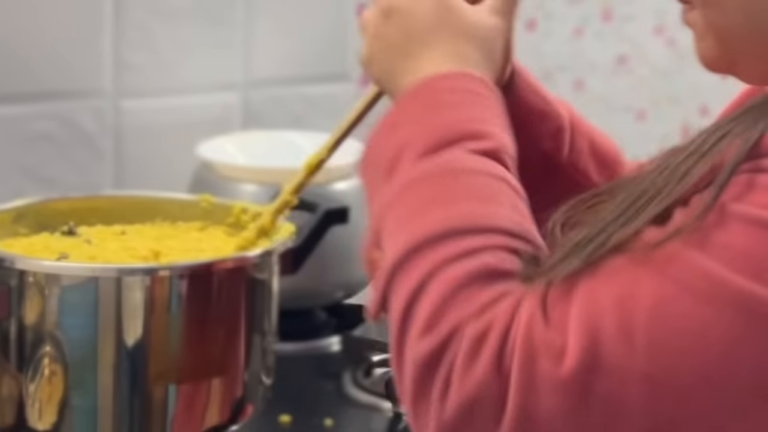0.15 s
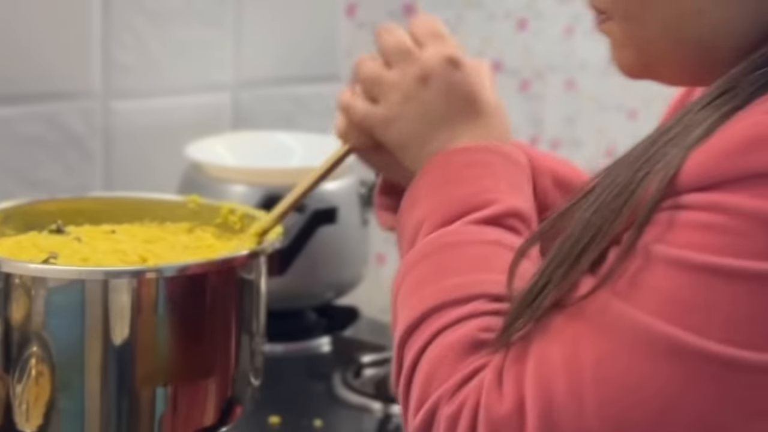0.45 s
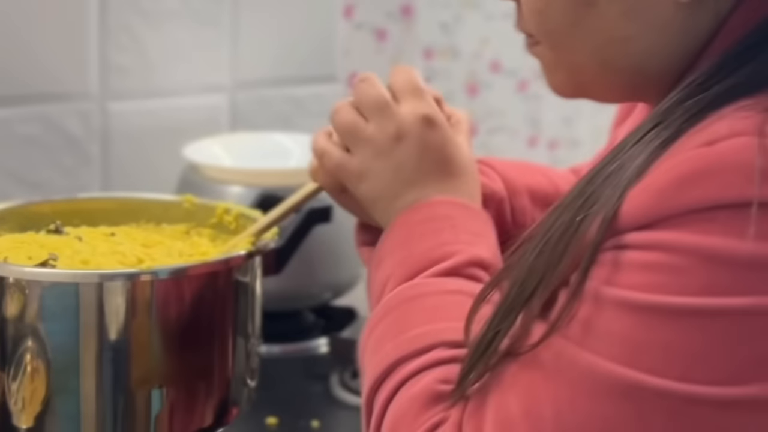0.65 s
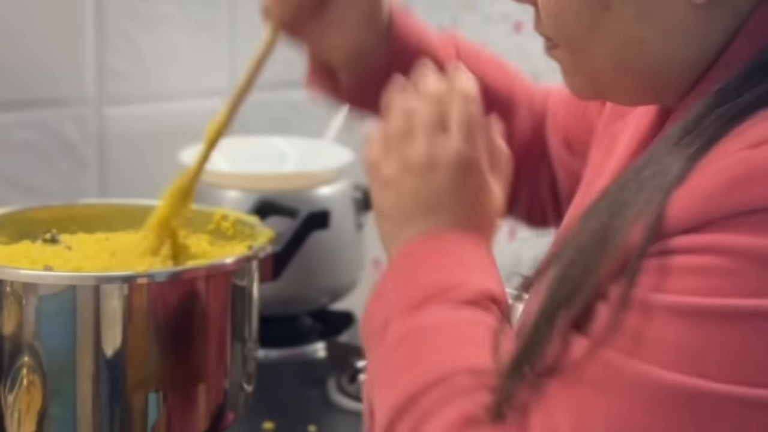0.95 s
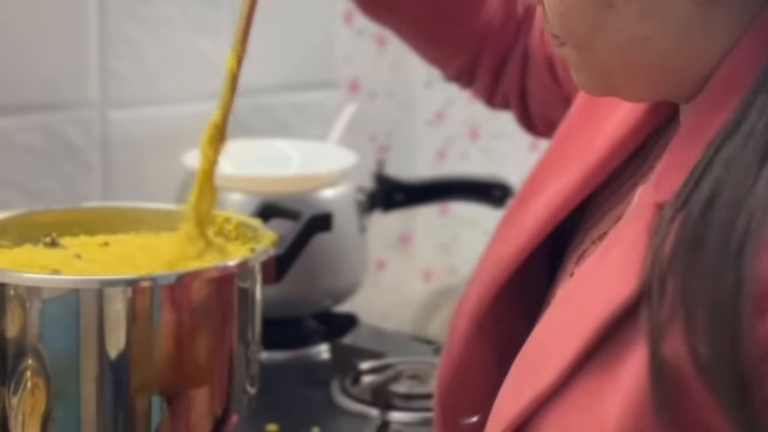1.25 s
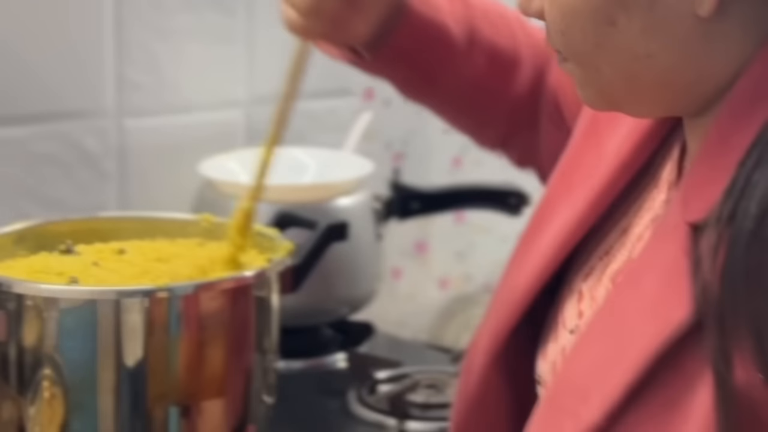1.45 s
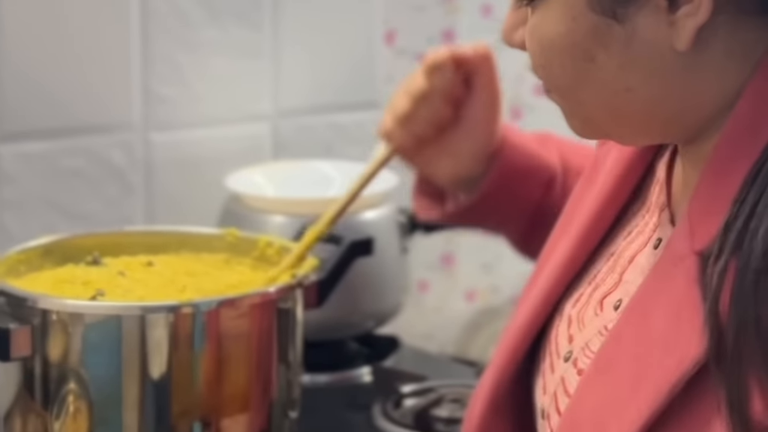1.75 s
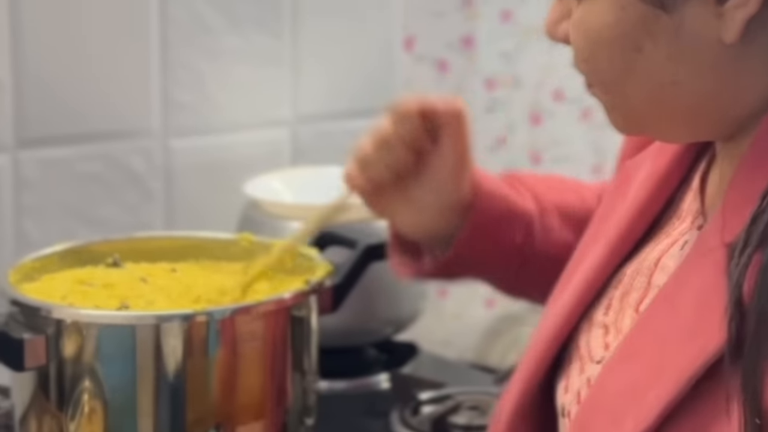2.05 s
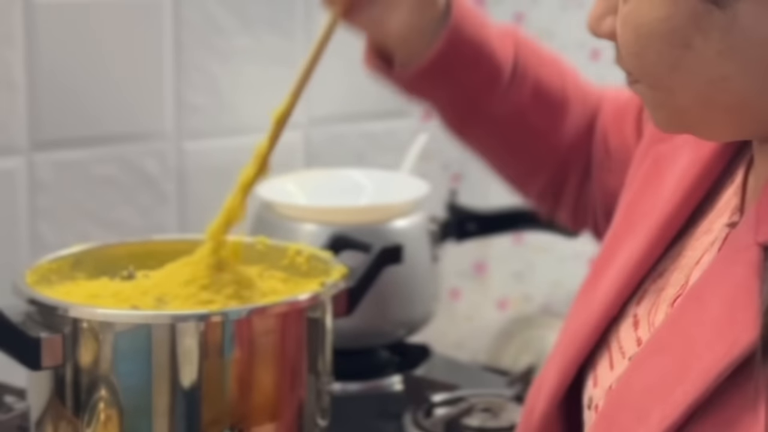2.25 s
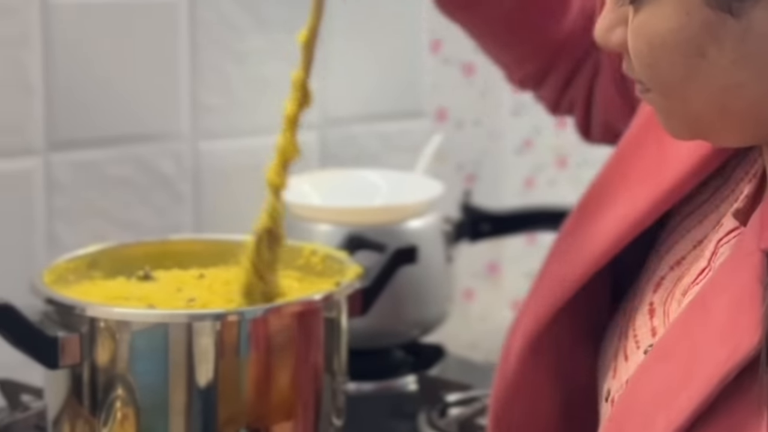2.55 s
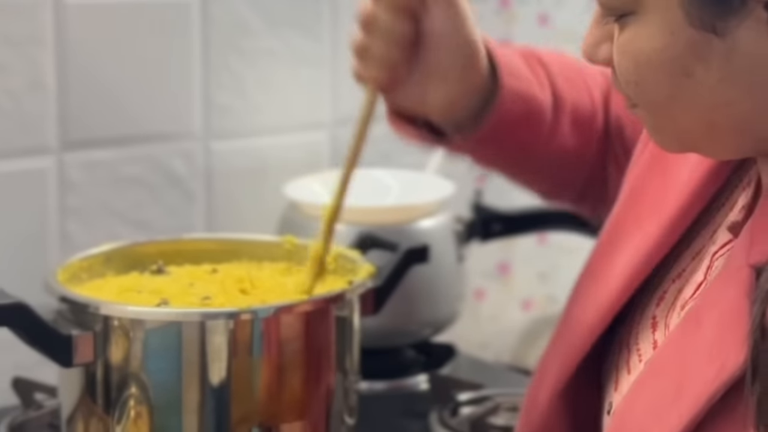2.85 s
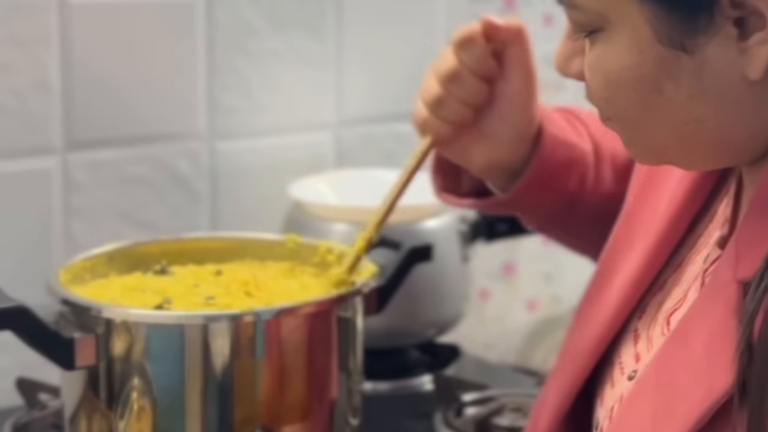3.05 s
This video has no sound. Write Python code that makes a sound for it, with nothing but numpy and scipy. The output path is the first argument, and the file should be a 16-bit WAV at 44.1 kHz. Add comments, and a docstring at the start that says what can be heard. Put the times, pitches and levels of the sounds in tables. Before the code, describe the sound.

Wood rubs and knocks on a metal pot full of thick food, in uneven bursts with brief squeaks and soft thuds; near microphone, short lively kitchen echo, faint rumble and hiss.

```python
"""Stirring thick food in a pressure cooker

A wooden spatula stirs thick food in a steel pot on a stove, in a small tiled kitchen. Knocks excite decaying
modes of the pot, short notes of the blade, a thud in the food and a bump on the stove. Drags along the wall
are trains of uneven slips that excite the wall's resonances; brief squeaks are rough stick-slip tones.
Noise echoes and a decaying tail form the room; a low rumble, a thin hiss and a breathy whistle lie underneath."""
import sys
import numpy as np
from scipy import signal
from scipy.fft import rfft, irfft
from scipy.io import wavfile
from scipy.ndimage import uniform_filter1d

SR = 44100
rng = np.random.default_rng(int(sys.argv[2]) if len(sys.argv) > 2 else 0)


def master(y):
    """Save y as 16-bit WAV."""
    cut = np.clip(np.atleast_2d(y).T, -1, 1)
    pcm = np.round(cut * 32767)  # scale
    wavfile.write(sys.argv[1], SR, pcm.astype(np.int16))


N = 141120  # length in samples

# Knocks of the spatula on the pot, and a very faint tick at 2.582 s just before one of them:
# t/s, crack level/dB, ring level/dB, brightness f/Hz, onset t/s, thud level/dB, thud pitch factor,
# stove bump level/dB, blade's low note f/Hz, its level/dB, high note f/Hz, its level/dB, blade t60/s
KNOCKS = [(0.284, -48, -50.5, 9400, 0.00066, -68, 1.6, -58, 1180, -61, 3750, -52.5, 0.064),
          (0.305, -44.5, -43, 6950, 0.0041, -52, 2.9, -72, 1110, -50.5, 2830, -50.5, 0.05),
          (0.901, -37, -42, 2900, 0.0038, -34, 1.11, -40.5, 1017, -45.5, 2816, -47.5, 0.017),
          (1.551, -39, -48, 3030, 0.0058, -35.5, 0.74, -35.5, 2460, -48, 2935, -56.5, 0.069),
          (1.647, -36.5, -38, 9400, 0.00074, -48, 1.26, -50, 1460, -37.5, 3870, -50, 0.014),
          (1.711, -39, -46, 5000, 0.00081, -48, 1.4, -59, 1083, -39.5, 2950, -51.5, 0.052),
          (1.806, -53, -48, 4000, 0.0022, -38.5, 0.69, -37, 868, -48, 2450, -48, 0.029),
          (1.828, -42.5, -48, 8800, 0.00017, -48.5, 0.81, -43, 1550, -46, 3740, -51, 0.027),
          (2.132, -36.5, -44.5, 2370, 0.0059, -34.5, 1.06, -42, 936, -49, 1680, -54.5, 0.035),
          (2.582, -64, -67, 6000, 0.0024, -70, 0.63, -62, 770, -68, 2110, -76, 0.029),
          (2.589, -35, -45, 11800, 0.0001, -41.5, 1.62, -54, 716, -41.5, 1393, -52, 0.19),
          (2.892, -44, -70, 3400, 0.0073, -65, 1.0, -55, 933, -52, 2500, -60, 0.04),
          (2.899, -31, -37.5, 3600, 0.0031, -41.5, 0.92, -32.5, 966, -32, 2420, -35.5, 0.031),
          (2.9155, -30.5, -31, 9150, 0.00083, -36.5, 0.72, -40, 286, -30.5, 2780, -34, 0.028)]
CRACK_DECAY_S, THUD_RISE_S, THUD_DECAY_S, BUMP_DECAY_S = 0.0042, 0.023, 0.02135, 0.0068
THUD_GLIDE = 0.3565  # share by which the thud starts higher, before the food closes round the blade
# Modes of the pot: f/Hz, relative level/dB, t60/s
POT_MODES = [(265, -22, 0.14), (334, -6, 0.097), (551, -13.5, 0.1), (927, -4.5, 0.048), (1063, 6.5, 0.02),
             (1330, 0.5, 0.018), (1730, 3.5, 0.017), (2260, -4, 0.027), (2334, 1, 0.014), (2575, -6, 0.012),
             (2640, -2.5, 0.017), (3420, -2, 0.026), (3800, -3, 0.018), (7050, -24, 0.17)]
# Spectrum of the crack of contact: f/Hz, relative level/dB
CRACK_SPECTRUM = [(60, -1.5), (250, -6.5), (650, 9.5), (1300, -2), (2800, 3), (4700, -4), (7000, -1),
                  (9500, -7.5), (13000, -13)]
# Spectrum of the thud through the food, before the pitch factor: f/Hz, relative level/dB
THUD_SPECTRUM = [(60, -63), (180, -1.5), (245, 4.5), (430, 0), (570, -7.5), (740, -31.5), (1000, -15.5),
                 (1500, -23.5), (5000, -62.5)]
# Spectrum of the bump on the stove: f/Hz, relative level/dB
BUMP_SPECTRUM = [(25, -1), (60, -20), (95, 4.5), (150, 0.5), (220, -10), (500, -38), (3000, -58)]

# Drags along the wall, one table each: t/s, rasp level/dB, dull rub through the food level/dB, judder level/dB
DRAGS = [
    [(0.284, -43.5, -70, -73), (0.315, -41, -39.5, -53), (0.35, -45.5, -58, -57),
     (0.395, -40.5, -44.5, -51), (0.435, -31.5, -36.5, -53), (0.468, -34, -44, -36), (0.51, -50, -39, -52),
     (0.55, -44, -42.5, -41), (0.585, -49, -54, -36), (0.615, -62, -64, -42.5), (0.66, -50.5, -51, -50.5),
     (0.74, -110, -76, -53.5)],
    [(1.65, -43, -60, -66), (1.686, -51, -57, -58), (1.692, -34, -34.5, -40), (1.72, -40.5, -39, -41),
     (1.745, -39.5, -30, -31), (1.77, -41, -45, -39.5), (1.80, -32, -60, -30.5), (1.83, -43.5, -26, -34),
     (1.855, -63, -67, -57), (1.895, -53, -64, -40.5), (1.955, -48.5, -47, -36.5), (2.03, -96, -57, -74)],
    [(3.03, -46, -53, -48), (3.085, -56, -51, -42.5), (3.095, -48, -57, -59), (3.12, -48.5, -52, -46),
     (3.18, -36, -48, -40), (3.2, -38, -45, -31)],
]
# Typical slip rate, its jitter (log units), spread of slip strength, level of grit against the slips
SLIPS_PER_S, SLIP_JITTER, SLIP_SPREAD_DB, GRIT_DB = 300, .5, 2.5, 2
# Spectrum of the rasp: f/Hz, relative level/dB
RASP_SPECTRUM = [(100, -18), (350, -4.5), (560, -0.5), (740, -6.5), (1000, -1.5), (1400, -5), (2000, -3),
                 (3100, -5), (3900, -12.5), (4700, -16.5), (6500, -15.5), (8500, -21), (12000, -37)]
# Spectrum of the dull rub: f/Hz, relative level/dB
RUB_SPECTRUM = [(100, -30.5), (250, -1.5), (345, 8), (440, -9), (570, 2), (720, -6.5), (1200, -20.5),
                (3000, -52.5)]
# Spectrum of the low judder: f/Hz, relative level/dB
JUDDER_SPECTRUM = [(25, -20), (55, -21), (90, 2), (135, 1.5), (195, -3.5), (270, 3), (365, -2), (440, -22),
                   (700, -21), (2000, -72)]
# Resonances of the rubbed wall: f/Hz, width f/Hz, relative level/dB
WALL_RESONANCES = [(582, 66, 3.5), (907, 54, 2), (1023, 250, 0.5), (1600, 164, 0), (1830, 52, 0.5),
                   (2300, 270, -11), (2710, 200, -20), (3390, 150, -2), (3730, 73, -19.5)]
# How freely the wall rings at the peak of each drag: level against the rasp/dB
WALL_RINGING_DB = [2, -2.5, -7]
WALL_GROWTH = 0.11  # exponent: the wall's ringing grows faster with pressure than the rasp
TRAVEL_HZ, TRAVEL_DB = 25.2, 4  # rate and limit of the resonances' coming and going as the blade travels
# The thin wall's song; the exponent below 1 makes it grow more slowly with pressure than the rasp
SING_HZ, SING_WIDTH_HZ, SING_DB, SING_GROWTH = 7174, 150, -26, .85

# Squeaks of the wood: t/s, length t/s, starting f/Hz, rise as a share of the pitch, level/dB
SQUEAKS = [(0.435, 0.049, 1831, 0, -42), (0.513, 0.062, 1832, 0.027, -47), (0.622, 0.047, 937, 0.0033, -47),
           (1.651, .015, 2290, 0.011, -38.5), (1.692, 0.037, 1390, 0.116, -32.5),
           (1.845, .03, 3580, 0.0083, -47.5), (1.921, 0.046, 953, 0.015, -46.5)]
SQUEAK_WOBBLE, SQUEAK_ROUGHNESS = .042, .7  # rms shares of pitch and of amplitude

# The blade stands above the rim: it is heard directly and stirs the room less than the pot does
BLADE_DIRECT_DB, BLADE_ROOM_DB = -4, -8
# Reverberation time of the kitchen: f/Hz, t60/s
KITCHEN_T60 = [(100, 0.59), (400, 0.3), (1000, 0.4), (2800, 0.3), (7000, 0.3), (12000, 0.29)]
WET_DB, EARLY_DB, EARLY_DECAY_S = 4, -1, 0.0066  # levels of tail and early echoes before equalisation
PATHS_PER_S = 5  # changes of room path as the blade travels
# Stereo width of the stirring: f/Hz, side level/dB before SIDE_DB
STIRRING_WIDTH = [(60, -44), (100, -67), (160, -24), (260, -21.5), (420, -7), (690, -6), (1120, -2),
                  (1830, -13.5), (2980, -1), (4850, 3.5), (7900, -26), (12000, 9.5)]
SIDE_DB, LEFT_DB, LEFT_LAG_S = -3.5, -.3, .000016  # LEFT_DB is added on the left and subtracted on the right
CUTOFF_HZ = 12000

# Spectrum of the rumble: f/Hz, relative level/dB
RUMBLE_SPECTRUM = [(20, -14), (32, -10), (48, -3.5), (80, 1.5), (130, -5.5), (200, -12), (290, -17),
                   (420, -28.5), (800, -35.5), (2000, -31.5), (5000, -53.5)]
# Spectrum of the hiss: f/Hz, relative level/dB
HISS_SPECTRUM = [(200, 19), (900, 7.5), (1350, 0.5), (1850, 5), (2800, 3), (4400, 0), (7000, 2.5),
                 (10000, -3), (12000, -5.5)]
# Level of the hiss relative to HISS_DB; it dips briefly and recovers: t/s, level/dB
HISS_LEVEL = [(0, 8), (.3, 11), (.72, -21), (.81, 6), (.97, 16), (1.25, 10), (1.499, 4.5), (2.06, 3),
              (2.18, 8.5), (2.35, 8.5), (2.55, 1.5), (2.75, 8.5), (3.2, 12.5)]
RUMBLE_DB, HISS_DB = -52.5, -72.5
WHISTLE_HZ, WHISTLE_WIDTH_HZ, WHISTLE_DB = 5354, 320, -73
# Stereo width of the background: f/Hz, side level/dB
AIR_WIDTH = [(60, -32), (100, -29), (160, -13.5), (260, -12.5), (420, -2.5), (690, 1.5), (1120, -1),
             (1830, -15), (2980, -2.5), (4850, 0.5), (7900, -18.5), (12000, 12.5)]


def knock(crack_db, ring_db, bright_hz, onset_s, thud_db, thud_pitch, bump_db,
          low_hz, low_db, high_hz, high_db, blade_t60):
    """Impact: one contact onset shapes pot, food, stove and blade; returns (pot, blade)."""
    t = np.arange(SR // 2) / SR
    onset = 1 - np.exp(-(t / onset_s) ** 2)
    contact = pot_contact(t, onset, crack_db, ring_db, bright_hz)
    blade = blade_note(t, onset, low_hz, low_db, blade_t60) + blade_note(t, onset, high_hz, high_db, blade_t60)
    thud = food_thud(t, onset, thud_pitch)
    bump = stove_bump(t, onset)
    return contact + amp(thud_db) * thud + amp(bump_db) * bump, blade


def pot_contact(t, onset, crack_db, ring_db, bright_hz):
    """Modal excitation: a noise crack and damped modes, low-passed to the brightness of the contact."""
    crack = colour(flatten(noise(len(t)) * np.exp(-t / CRACK_DECAY_S)), CRACK_SPECTRUM)
    ring = sum(amp(db - 60 * t / t60) * np.sin(2 * np.pi * (hz * t + rng.random()))
               for hz, db, t60 in POT_MODES)
    contact = amp(crack_db) * burst(crack * onset) + amp(ring_db) * burst(ring * onset)
    return signal.lfilter(*signal.butter(3, min(bright_hz, SR / 2 - 1000), fs=SR), contact)


def blade_note(t, onset, hz, db, t60):
    """Damped vibration: one short note of the blade, set by grip and contact point."""
    return amp(db) * burst(onset * amp(-60 * t / t60) * np.sin(2 * np.pi * hz * t))


def food_thud(t, onset, pitch):
    """Viscous loading: a swelling and dying noise thud sinks as the food closes round the blade."""
    swell = (1 - np.exp(-t / THUD_RISE_S)) * np.exp(-t / THUD_DECAY_S)
    push = flatten(noise(len(t)) * swell)
    thud = colour(onset * push, np.array(THUD_SPECTRUM) * [pitch, 1])
    # Reading the sound fast at first raises its pitch there
    glide = THUD_GLIDE * THUD_DECAY_S * (1 - np.exp(-t / THUD_DECAY_S))
    return burst(np.interp(t + glide, t, thud))


def stove_bump(t, onset):
    """Structural transmission: the knock reaches the stove as a short burst of mostly low noise."""
    push = flatten(noise(len(t)) * np.exp(-t / BUMP_DECAY_S))
    return burst(colour(onset * push, BUMP_SPECTRUM))


def drags():
    """Friction: slips rasp and ring the wall; separate noises give the dull rub and low judder."""
    t, out = np.arange(N) / SR, np.zeros(N)
    drive = slips()
    drive = drive - drive.mean()
    wall = unit(sum(amp(db) * unit(wall_resonance(drive, hz, width, 6 * width))
                    for hz, width, db in WALL_RESONANCES))
    sing = unit(wall_resonance(drive, SING_HZ, SING_WIDTH_HZ, 4 * SING_WIDTH_HZ))
    rasp = unit(colour(drive, RASP_SPECTRUM))
    rub = unit(colour(noise(), RUB_SPECTRUM))
    judder = unit(colour(noise(), JUDDER_SPECTRUM))
    for drag, wall_db in zip(DRAGS, WALL_RINGING_DB):
        s, *levels = np.transpose(drag)
        # Silent outside the drag
        rasp_gain, rub_gain, judder_gain = (amp(np.interp(t, s, db, -300, -300)) for db in levels)
        ringing = amp(wall_db) * (rasp_gain / rasp_gain.max()) ** WALL_GROWTH
        out += rasp_gain * (rasp + ringing * wall) / np.sqrt(1 + ringing ** 2)
        out += amp(SING_DB) * rasp_gain ** SING_GROWTH * sing
        out += rub_gain * rub + judder_gain * judder
    return out


def slips():
    """Stick-slip: wood on steel gives uneven pulses, each trailed by fine decaying grit."""
    rate = SLIPS_PER_S * np.exp(SLIP_JITTER * unit(uniform_filter1d(noise(), size=150)))
    strength = amp(SLIP_SPREAD_DB * np.clip(noise(), -2, 2))
    # One pulse whenever the accumulated rate passes a whole number
    pulses = np.diff(np.floor(np.cumsum(rate) / SR), prepend=0) * strength
    grit_envelope = signal.lfilter([1], [1, -np.exp(-1 / (0.004 * SR))], pulses)  # 4 ms decay
    grit = noise() * grit_envelope
    return unit(unit(pulses) + amp(GRIT_DB) * unit(grit))


def wall_resonance(drive, hz, width, skirt_width):
    """Moving excitation point: a resonance of the wall comes and goes as the blade travels."""
    ring = resonate(resonate(drive, hz, width), hz, skirt_width)
    return ring * amp(TRAVEL_DB * np.tanh(drift(TRAVEL_HZ)))


def squeak(length, hz, rise, db):
    """Stick-slip oscillation: a short, rough tone whose pitch can rise as the blade speeds up."""
    count = int(length * SR)
    wobble, rough = (unit(uniform_filter1d(noise(count), size=100)) for _ in range(2))
    pitch = hz * (1 + rise * np.linspace(0, 1, count) + SQUEAK_WOBBLE * (wobble - wobble.mean()))
    tone = np.sin(2 * np.pi * np.cumsum(pitch) / SR) * (1 + SQUEAK_ROUGHNESS * rough)
    return amp(db) * unit(tone) * signal.windows.tukey(count, .15)


def kitchen(source, count=3):
    """Multipath: sets of paths fade into each other as the blade moves; returns (mid, side)."""
    turn = PATHS_PER_S * np.arange(N) / SR
    shares = np.array([np.maximum(np.cos(2 * np.pi * (turn - k) / count), 0) for k in range(count)])
    out = np.zeros((2, N))
    for share in shares / np.linalg.norm(shares, axis=0):
        path = reflections()
        path[0] += 1  # direct sound
        out += [signal.fftconvolve(source * share, flatten(taps, size=70))[:N]
                for taps in (path, reflections())]
    return out


def reflections():
    """Reverberation: quick echoes from the tiles behind the stove, and the kitchen's decaying tail."""
    t = np.arange(SR * 3 // 4) / SR
    hz, when, z = signal.stft(noise(len(t)), SR, nperseg=256)
    decay = amp(-60 * when / read(KITCHEN_T60, hz)[:, None])
    tail = signal.istft(z * decay, SR, nperseg=256)[1][:len(t)]
    tail = tail * np.minimum(t / 0.0086, 1)  # fades in over 8.6 ms
    sparse = rng.random(len(t)) < 2000 / SR  # 2000 echoes a second on average
    early = noise(len(t)) * sparse * np.exp(-t / EARLY_DECAY_S) * (t > .001)
    return amp(WET_DB) * tail / np.linalg.norm(tail) + amp(EARLY_DB) * early / np.linalg.norm(early)


def background():
    """Filtered noise: low room rumble, a hiss of varying level and a thin breathy whistle."""
    rumble = amp(RUMBLE_DB) * unit(colour(noise(), RUMBLE_SPECTRUM))
    hiss_db = HISS_DB + np.interp(np.arange(N) / SR, *np.transpose(HISS_LEVEL))
    hiss = unit(colour(noise(), HISS_SPECTRUM)) * amp(hiss_db)
    whistle = resonate(resonate(noise(), WHISTLE_HZ, 2 * WHISTLE_WIDTH_HZ), WHISTLE_HZ, WHISTLE_WIDTH_HZ)
    return rumble + hiss + amp(WHISTLE_DB) * unit(whistle)


def widen(mid, side, width):
    """Mid-side stereo: left and right are sum and difference, nearly alike in the bass."""
    side = colour(side, width)
    return np.array([mid + side, mid - side])


def amp(db):
    """Level to amplitude ratio: 20 dB per factor of ten."""
    return 10 ** (np.asarray(db) / 20)


def unit(x):
    """Normalisation of a steady sound to rms 1."""
    return x / np.sqrt(np.mean(x ** 2) + 1e-20)


def burst(x):
    """Normalisation of a short sound to the energy of 40 ms at rms 1."""
    return x * np.sqrt(.04 * SR / np.sum(x ** 2))


def read(points, hz):
    """Interpolation of a table on a logarithmic frequency axis."""
    f, value = np.transpose(points)
    return np.interp(np.log(hz + 1), np.log(f), value)


def add(mix, s, sound):
    """Superposition: adds a sound to the mix in place at time s."""
    part = mix[max(round(s * SR), 0):][:len(sound)]
    part += sound[:len(part)]


def colour(x, points, size=4096):
    """Minimum-phase filtering: the Hilbert transform of log gain gives a causal filter."""
    log_gain = np.log(amp(read(points, abs(np.fft.fftfreq(size, 1 / SR)))))
    taps = np.fft.ifft(np.exp(signal.hilbert(log_gain).conj())).real
    return signal.fftconvolve(x, taps[:size // 2])[:len(x)]


def flatten(x, size=90):
    """Minimum-phase equalisation: evens out broad chance colour, keeping the attack; energy about 1."""
    z = np.fft.fft(x, 2 * len(x))
    power = uniform_filter1d(abs(z) ** 2, size, mode="wrap")
    power = uniform_filter1d(power, size, mode="wrap")
    inverse = np.exp(signal.hilbert(-.5 * np.log(abs(power) + 1e-12)).conj())
    return np.fft.ifft(z * inverse).real[:len(x)]


def resonate(x, hz, width):
    """Simple resonance: a second-order peak of given bandwidth."""
    return signal.lfilter(*signal.iirpeak(hz, hz / width, SR), x)


def noise(size=N):
    """White noise: independent Gaussian samples."""
    return rng.standard_normal(size)


def drift(hz):
    """Low-passed noise: chance variation about hz times a second, rms 1."""
    return unit(irfft(rfft(noise()) * np.exp(-(np.fft.rfftfreq(N, 1 / SR) / hz) ** 2), N))


def scene():
    """Superposition: the stirring in its room, slightly to the right, over the background."""
    pot, blade = drags(), np.zeros(N)
    for s, *row in KNOCKS:
        pot_sound, blade_sound = knock(*row)
        add(pot, s, pot_sound)
        add(blade, s, blade_sound)
    for s, *row in SQUEAKS:
        add(blade, s, squeak(*row))
    mid, side = kitchen(pot + amp(BLADE_ROOM_DB) * blade)
    left, right = widen(mid + amp(BLADE_DIRECT_DB) * blade, amp(SIDE_DB) * side, STIRRING_WIDTH)
    # A linear phase delays the left channel
    lag = np.exp(-2j * np.pi * np.fft.rfftfreq(N, 1 / SR) * LEFT_LAG_S)
    left = irfft(rfft(left) * lag, N)
    stirring = np.array([left, right]) * amp([[LEFT_DB], [-LEFT_DB]])
    return stirring + widen(background(), background(), AIR_WIDTH)


def record(dry):
    """Band limitation: a linear-phase low-pass filter removes the highest treble."""
    taps = signal.firwin(255, CUTOFF_HZ, window=("kaiser", 8), fs=SR)
    return signal.oaconvolve(dry, taps[None], "same")


dry = scene()
out = record(dry)
master(out)
```